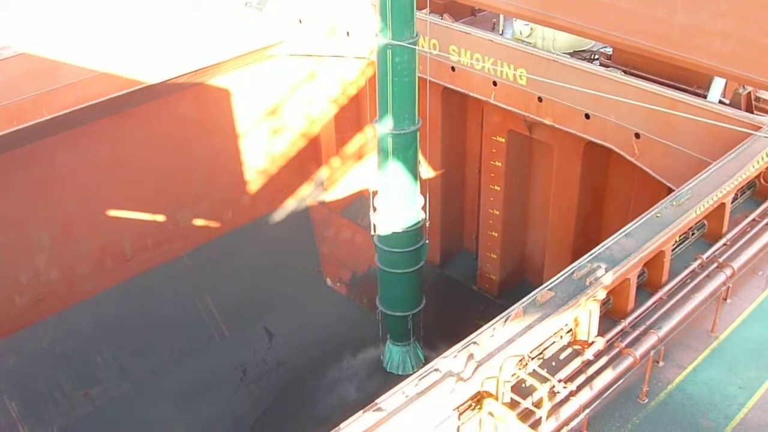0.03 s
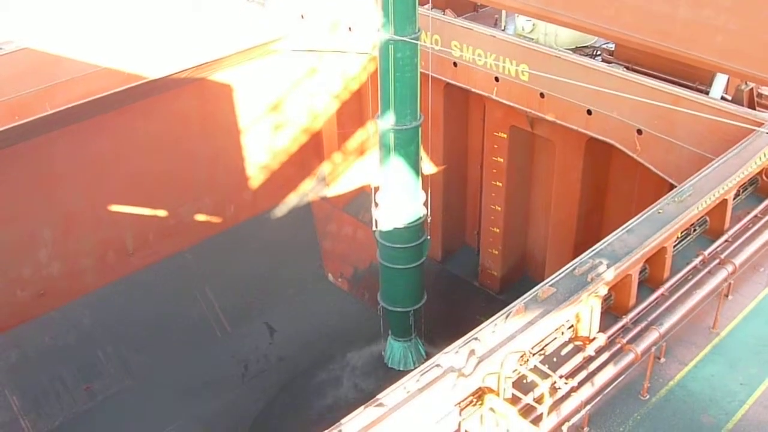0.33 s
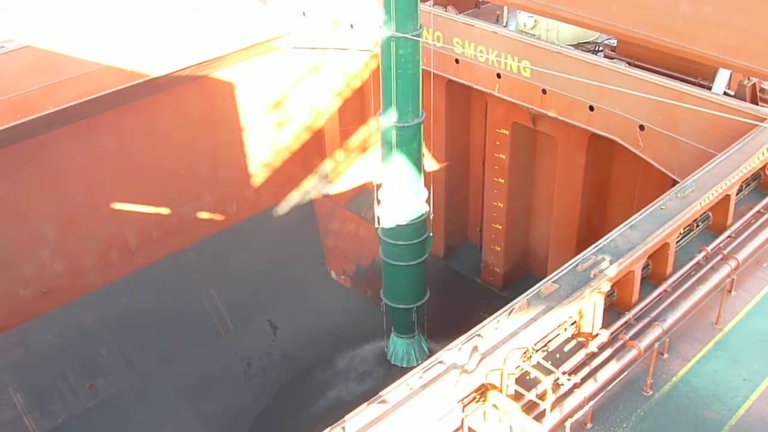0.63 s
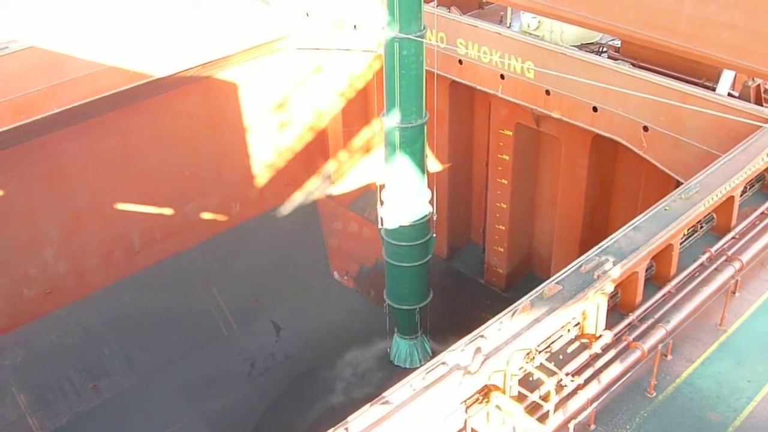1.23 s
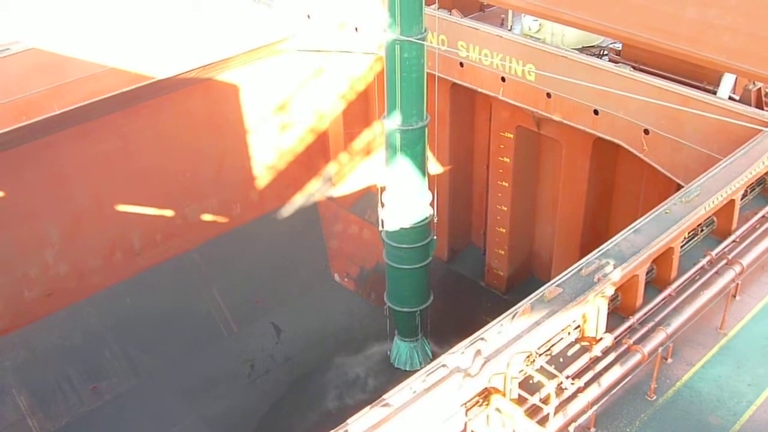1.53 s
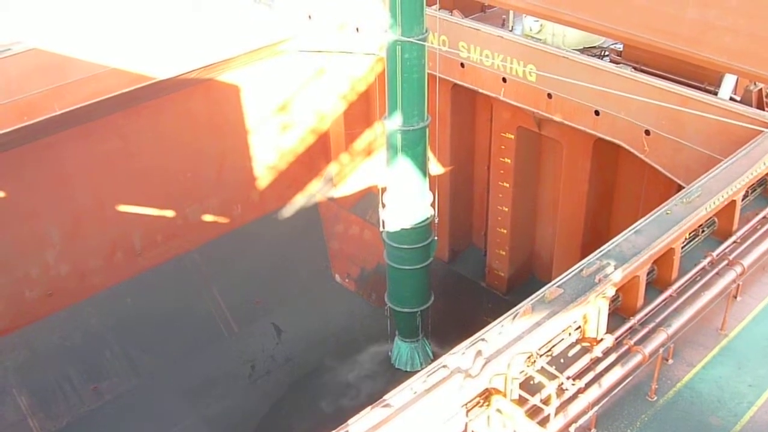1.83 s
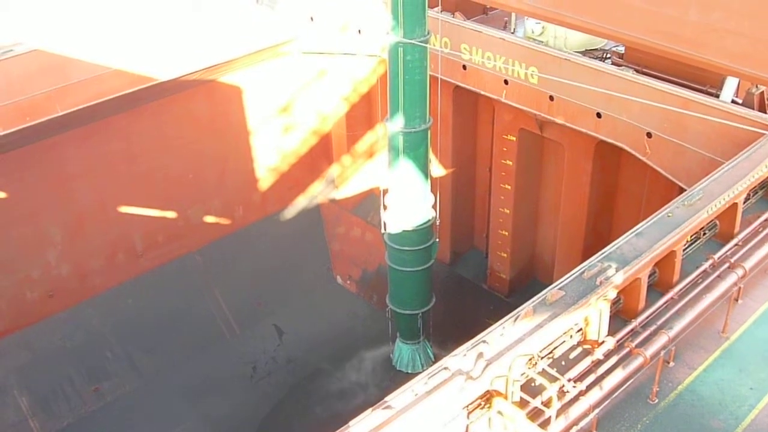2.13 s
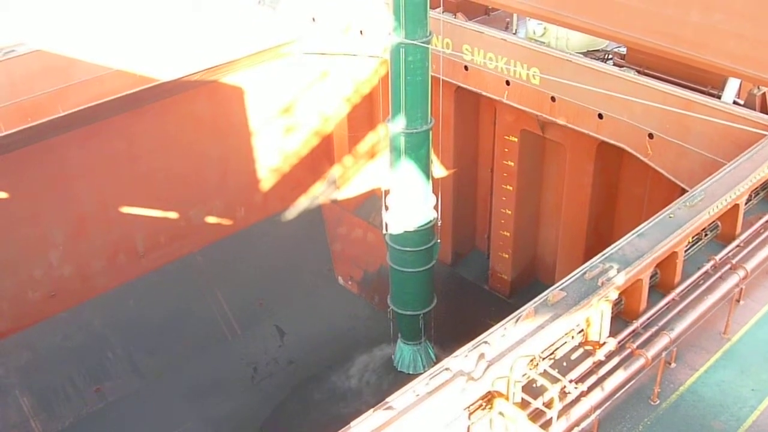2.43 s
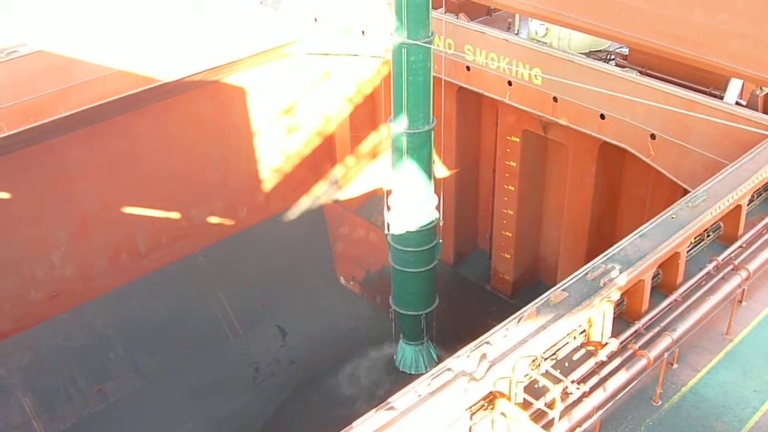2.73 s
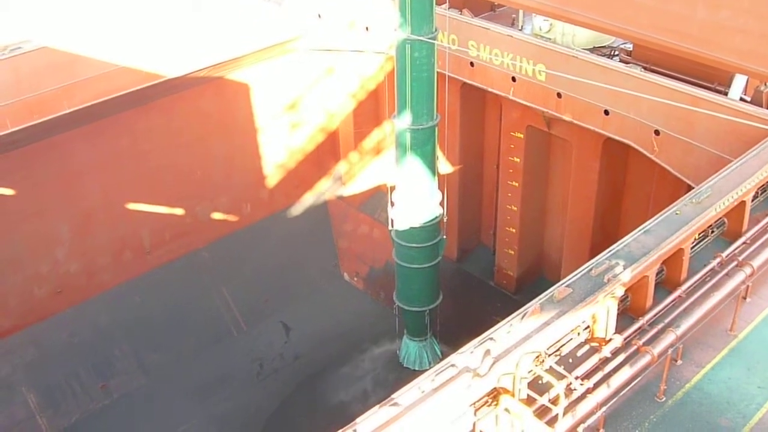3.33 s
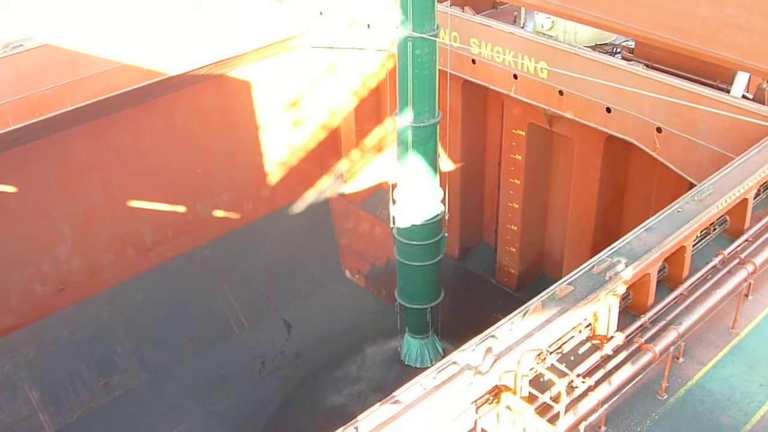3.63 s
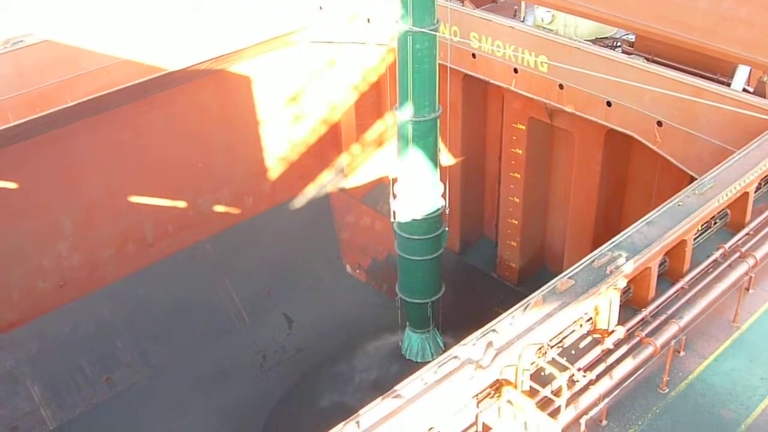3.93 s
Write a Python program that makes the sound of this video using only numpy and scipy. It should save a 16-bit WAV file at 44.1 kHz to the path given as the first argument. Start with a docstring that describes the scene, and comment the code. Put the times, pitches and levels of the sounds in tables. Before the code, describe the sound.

Bulk material pours steadily down a chute into a ship's steel hold, heard from the deck. A low machine roar, humming fans and a diesel throb run throughout, while heavier clumps land with brief, dull booms.

```python
"""Bulk material pours down a chute into a ship's steel hold, heard from the deck.
From the start, grains rush and swell with the flow over a low machine roar; a diesel throbs,
a conveyor drive hums, gear whines flutter, two fans beat and smaller machines whine.
Heavy slugs boom in the hold four times in about the first second, once near 2 s and five times
from 2.9 s on. The diesel grows louder to the end."""
import sys
import numpy as np
from scipy import signal
from scipy.fft import rfft, irfft, next_fast_len
from scipy.io import wavfile
from scipy.ndimage import uniform_filter1d, map_coordinates

SR = 44100
rng = np.random.default_rng(int(sys.argv[2]) if len(sys.argv) > 2 else 0)


def persist_wave(psi):
    """Save psi, clipped to +-1, as 16-bit WAV."""
    counts = np.round(np.clip(psi, -1, 1) * 32767).astype(np.int16)
    wavfile.write(sys.argv[1], SR, np.atleast_2d(counts).T)


N = 176400
TIME_S = np.arange(N) / SR


def amp(db):
    """Decibels to gain."""
    return 10 ** (np.asarray(db) / 20)


def unit(x):
    """x at rms 1."""
    return x / np.sqrt(np.mean(x ** 2) + 1e-20)


def over_time(points):
    """(time [s], value) points, interpolated per sample."""
    return np.interp(TIME_S, *np.transpose(points))


def over_hz(points, hz):
    """(frequency [Hz], value) points, interpolated on a log axis."""
    knots_hz, values = np.transpose(points)
    return np.interp(np.log(hz + 1), np.log(knots_hz + 1), values)


def wobble(knots_per_s):
    """Smooth random curve."""
    knots = rng.standard_normal(int(N * knots_per_s / SR) + 4)
    return map_coordinates(knots, [TIME_S * knots_per_s])


def filtered(x, response):
    """x through the zero-phase gain response(hz)."""
    size = next_fast_len(N + SR // 2)
    return irfft(rfft(x, size) * response(np.fft.rfftfreq(size, 1 / SR)), size)[:N]


def coloured(x, spectrum):
    """x shaped by a spectrum, 12 dB/octave down beyond its ends; rms 1."""
    low_hz, high_hz = spectrum[0][0], spectrum[-1][0]
    skirts = lambda hz: (np.minimum(hz / low_hz, 1) * high_hz / np.maximum(hz, high_hz)) ** 2
    return unit(filtered(x, lambda hz: amp(over_hz(spectrum, hz)) * skirts(hz)))


def patchy_noise(spread_db):
    """White noise with time-frequency patches of random gain; rms 1."""
    bins = signal.stft(rng.standard_normal(N), nperseg=512)[2]
    patches = uniform_filter1d(rng.standard_normal(bins.shape), size=6, axis=0)
    patches = uniform_filter1d(patches, size=14, axis=1)
    return unit(signal.istft(bins * amp(spread_db * unit(patches)), nperseg=512)[1][:N])


def sine(rms_db, phase_rad):
    """Sine at an rms level."""
    return amp(rms_db) * np.sqrt(2) * np.sin(phase_rad)


def tones(lines, waver_db, drift_rad, knots_per_s):
    """(frequency [Hz], level [dB]) tones; level and phase waver on the way through the air."""
    out = np.zeros(N)
    for hz, db in lines:
        phase_rad = 2 * np.pi * (hz * TIME_S + rng.random()) + drift_rad * wobble(knots_per_s)
        out += sine(db + waver_db * wobble(knots_per_s), phase_rad)
    return out


def pour(flow_db):
    """Grains slide down the chute and strike the heap; the body follows the flow more than the hiss."""
    # pouring material: (frequency [Hz], relative density [dB])
    spectrum = [(200, -8), (600, -0.5), (1000, -0.5), (1400, -1), (1800, -4.5), (2300, -11), (2700, -12.5),
                (3400, -22), (4300, -25.5), (5300, -24), (6500, -29.5), (7500, -35), (8300, -46.5),
                (8800, -58.5)]
    grains_per_s, grain_spread_db, grain_db = 9000, 2, -7
    clumps_per_s, clump_db = 22, 0.24
    hiss_hz, body_db_per_db, hiss_db_per_db = 2600, 1.15, 0.57
    level_db, echo_db = -36, -13
    strikes = rng.random(N) < grains_per_s / SR
    impacts = strikes * rng.standard_normal(N) * amp(grain_spread_db * rng.standard_normal(N))
    stream = coloured(patchy_noise(spread_db=0.25) + amp(grain_db) * unit(impacts), spectrum)
    body = filtered(stream, lambda hz: 1 / (1 + (hz / hiss_hz) ** 2))
    hiss = stream - body
    body_db = body_db_per_db * flow_db + clump_db * wobble(clumps_per_s)
    rush = body * amp(body_db) + hiss * amp(hiss_db_per_db * flow_db)
    return amp(level_db) * unit(rush + amp(echo_db) * hold_echo(rush))


def hold_echo(x):
    """The steel hold rings; the treble dies first."""
    # ring of the hold: (frequency [Hz], T60 [s])
    decay = [(200, 0.66), (1500, 0.87), (8000, .3)]
    hz, age_s, bins = signal.stft(rng.standard_normal(SR), SR, nperseg=256)
    decay_db = -60 * age_s / over_hz(decay, hz)[:, None]
    tail = signal.istft(bins * amp(decay_db), SR, nperseg=256)[1]
    return signal.fftconvolve(x, tail / np.linalg.norm(tail))[:N]


def roar(flow_db):
    """The loader and its fans roar, swelling with the load, most in the bass."""
    # air and machinery: (frequency [Hz], relative density [dB])
    spectrum = [(18, -31.5), (35, -19), (60, -7.5), (115, -1.2), (200, 0.4), (310, -3), (450, -4),
                (570, -9), (800, -9.5), (1000, -17.5), (1600, -31.5), (3000, -54)]
    level_db, bass_hz = -26.5, 280
    bass_db_per_db, upper_db_per_db = 0.33, 0.22
    air = coloured(patchy_noise(spread_db=0.1), spectrum)
    bass = filtered(air, lambda hz: 1 / (1 + (hz / bass_hz) ** 4))
    upper = air - bass
    return amp(level_db) * (bass * amp(bass_db_per_db * flow_db) + upper * amp(upper_db_per_db * flow_db))


def midrange_swell(x):
    """The middle band of x swells and sinks."""
    # band swell: (time [s], level before centring and depth [dB])
    swell = [(0, -0.5), (0.15, -0.5), (0.25, 3), (0.33, 0), (0.48, 5), (0.6, -0.5), (0.88, -1), (1.2, -1.5),
             (1.5, -2), (1.58, 2.5), (1.77, -3), (1.9, 0), (1.97, -2), (2.03, 2.5), (2.16, -3), (2.32, 4.5),
             (2.47, 0.5), (2.64, 1.5), (2.9, 0.5), (3.07, 1), (3.34, 1), (3.42, -3.5), (3.6, 0.5),
             (3.87, 0), (3.99, 0)]
    centre_hz, sigma_octaves, depth = 740, 0.54, 0.8
    swell_db = over_time(swell)
    band = filtered(x, lambda hz: np.exp(-0.5 * (np.log2((hz + 1) / centre_hz) / sigma_octaves) ** 2))
    return x + band * (amp(depth * (swell_db - swell_db.mean())) - 1)


def diesel():
    """Close multiples of the engine cycle make a low throb that grows louder."""
    # engine orders: (multiple of the cycle, relative level [dB])
    orders = [(4, -59), (6, -58), (7, -56), (8, -50), (14, -51), (15, -54), (16, -46), (17, -46.5),
              (18, -52.5)]
    cycle_hz, midway_gain_db, rise_db_per_s = 7.345, -1, 2.5
    gain_db = midway_gain_db + rise_db_per_s * (TIME_S - N / SR / 2)
    lines = [(k * cycle_hz, db) for k, db in orders]
    return amp(gain_db) * tones(lines, waver_db=-2.5, drift_rad=0.2, knots_per_s=3.3)


def drive():
    """The conveyor drive hums in slightly wavering harmonics."""
    # drive hum: (harmonic number, relative level [dB])
    harmonics = [(2, -41), (3, -37), (8, -51), (10, -52), (14, -64)]
    hum_hz, gain_db = 114.55, -0.5
    lines = [(k * hum_hz, db) for k, db in harmonics]
    return amp(gain_db) * tones(lines, waver_db=1.5, drift_rad=0.2, knots_per_s=7)


def gears():
    """Gear whines of the drive and a slower motor beat in a quick flutter."""
    # gear tones: (frequency [Hz], level before swell [dB])
    lines = [(687.3, -36.7), (673.0, -43)]
    # swell of both: (time [s], gain [dB])
    swell = [(0, 2.7), (0.48, 1.5), (0.85, -0.5), (1.55, 1), (1.8, -4), (2.05, 0.8), (2.85, .4),
             (3.25, 3.1), (3.53, -3), (4, 1.8)]
    in_phase_s, drift_rad, waver_db = 0.054, 0.24, 0.6
    out = np.zeros(N)
    for hz, db in lines:
        phase_rad = 2 * np.pi * hz * (TIME_S - in_phase_s) + drift_rad * wobble(5.4)
        out += sine(db + waver_db * wobble(5.2), phase_rad)
    return amp(over_time(swell)) * out


def fans():
    """Blade tones of two fans at nearly the same speed beat; the hum swells slowly."""
    # per fan: (blade rate [Hz], relative levels of harmonics 1, 2, 3 [dB])
    blades = [(439.52, -29.2, -48.5, -60), (443.88, -36.8, -51.5, -48.3)]
    # swell of both: (time [s], level before centring and depth [dB])
    swell = [(0.0, -5), (0.15, -1.5), (0.5, 0.3), (0.87, 1.5), (1.3, -2.3), (1.56, 1), (1.75, -0.2),
             (1.9, -2.5), (2.08, 0.3), (2.28, 1.7), (2.52, 1.5), (2.8, -3), (3.2, 1), (3.48, -1.4),
             (3.7, -0.5), (3.85, 0.8), (3.99, 1.2)]
    in_phase_s, drift_rad, waver_db = 0.394, 0.091, 0.48
    gain_db, depth = 0.25, 0.89
    out = np.zeros(N)
    for hz, *levels_db in blades:
        phase_rad = 2 * np.pi * hz * (TIME_S - in_phase_s) + drift_rad * wobble(5.94)
        for k, db in enumerate(levels_db, 1):
            out += sine(db + waver_db * wobble(8), k * phase_rad)
    swell_db = over_time(swell)
    return amp(gain_db + depth * (swell_db - swell_db.mean())) * out


def small_machines():
    """Pumps and motors around the deck whine faintly."""
    # whines: (frequency [Hz], relative level [dB])
    lines = [(149, -44), (204.6, -48.5), (236.9, -47), (243.6, -47.5), (384.8, -47.5), (473.6, -42.5),
             (787.7, -46.3), (816.1, -53), (1403.2, -60.5), (1503, -56.5), (1560.9, -54), (3000.2, -71),
             (3119, -75), (6666.8, -84), (7529.9, -84.5)]
    gain_db = -0.5
    return amp(gain_db) * tones(lines, waver_db=1.5, drift_rad=0.28, knots_per_s=4.05)


def slugs():
    """Heavier slugs of cargo land and make the hold boom briefly."""
    # landings: (peak time [s], two-sigma width [s], peak level [dB])
    landings = [(0.061, 0.072, -24), (0.417, 0.059, -27.5), (0.759, 0.057, -27.5), (1.022, 0.054, -31),
                (1.96, .05, -32.5), (2.943, 0.093, -30), (3.224, 0.043, -29), (3.514, 0.091, -29),
                (3.791, .035, -29.5), (3.95, .06, -31)]
    # boom of the hold: (frequency [Hz], relative density [dB])
    spectrum = [(80, -25.5), (125, -1.5), (190, 1), (250, -2.5), (340, -17)]
    envelope = sum(amp(db) * np.exp(-2 * ((TIME_S - peak_s) / width_s) ** 2)
                   for peak_s, width_s, db in landings)
    return envelope * coloured(rng.standard_normal(N), spectrum)


def scene():
    """Pour and machinery, mono."""
    # flow through the chute: (time [s], relative level [dB])
    flow = [(0.0, 1), (0.3, -1.5), (0.599, 1.6), (0.66, -0.5), (0.84, 1.4), (0.9, -2.5), (0.96, 1.5),
            (1.138, -2.5), (1.349, -2), (1.5, -0.5), (1.68, 1), (1.77, -4.5), (1.83, -1.5), (2.22, 0),
            (2.28, -0.7), (2.369, 0.5), (2.459, -1.1), (2.88, 1.5), (3.212, 0.1), (3.3, 1.6), (3.39, -3),
            (3.72, 1.8), (3.9, -1), (3.99, 0.5)]
    flow_db = over_time(flow)
    noise = midrange_swell(pour(flow_db) + roar(flow_db))
    return (noise + slugs() + diesel() + drive() + gears() + fans() + small_machines())[None]


def record(dry):
    """Short fades at both ends, then a brick-wall low-pass."""
    fade_s, top_hz = 0.003, 8750
    edge_s = np.minimum(TIME_S, TIME_S[::-1])
    faded = dry[0] * np.minimum(edge_s / fade_s, 1)
    return filtered(faded, lambda hz: hz < top_hz)[None]


dry = scene()
out = record(dry)
persist_wave(out)
```